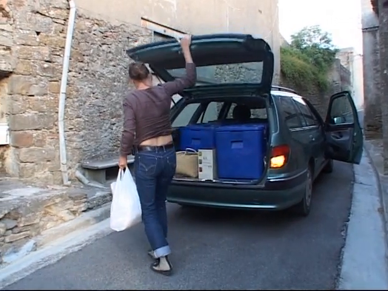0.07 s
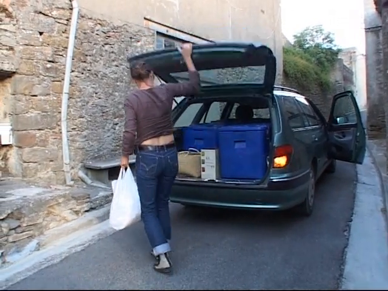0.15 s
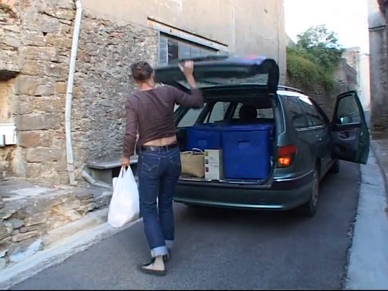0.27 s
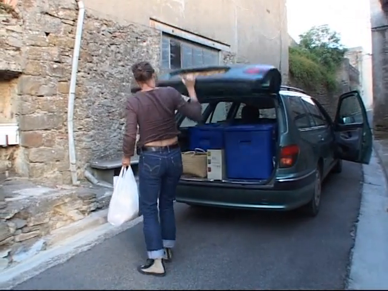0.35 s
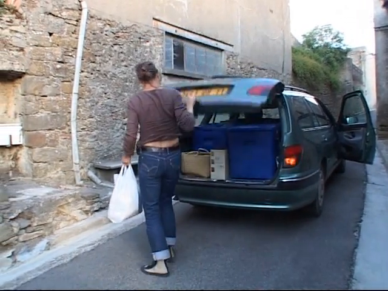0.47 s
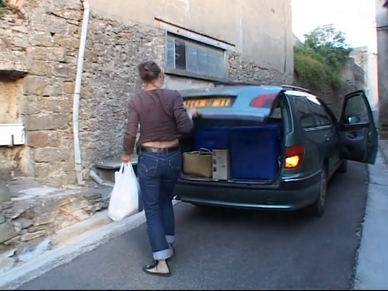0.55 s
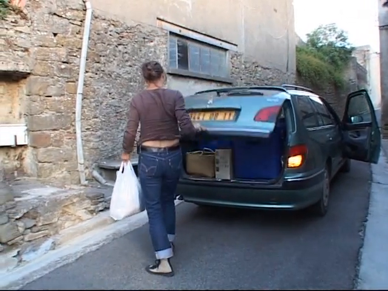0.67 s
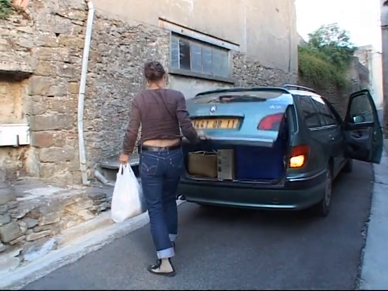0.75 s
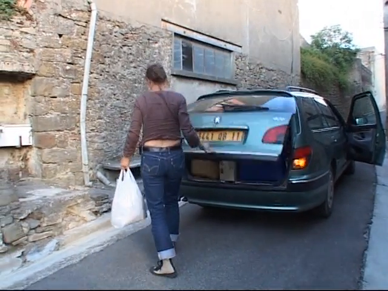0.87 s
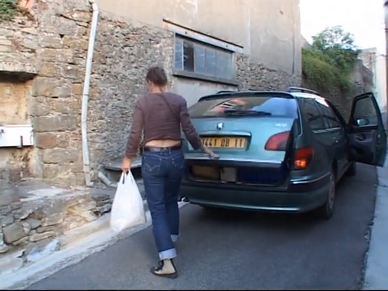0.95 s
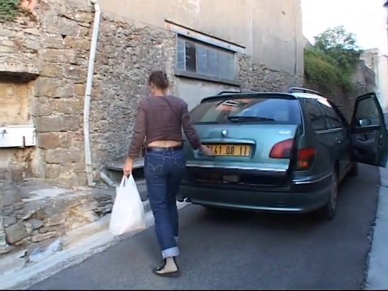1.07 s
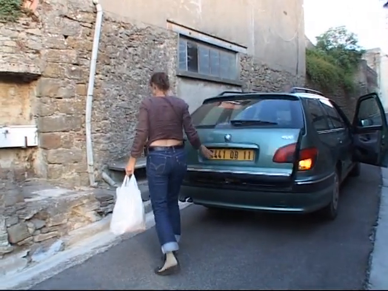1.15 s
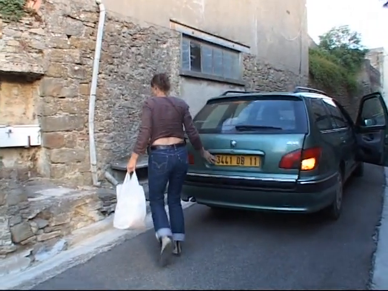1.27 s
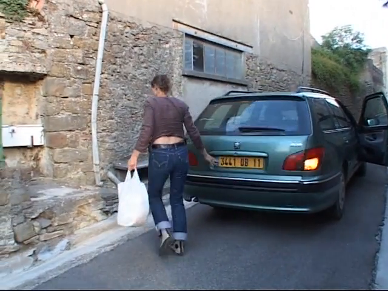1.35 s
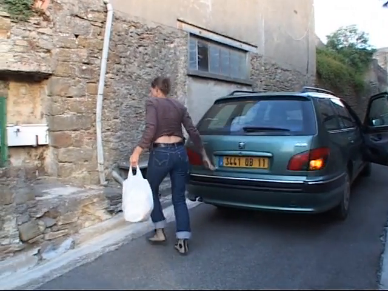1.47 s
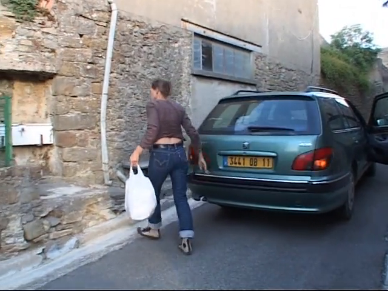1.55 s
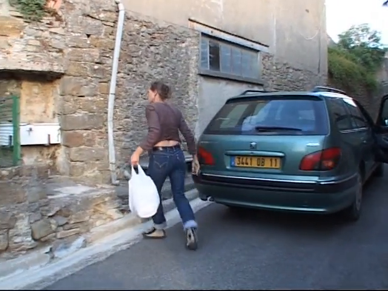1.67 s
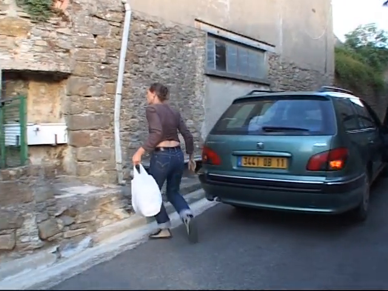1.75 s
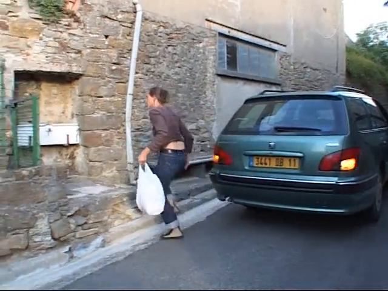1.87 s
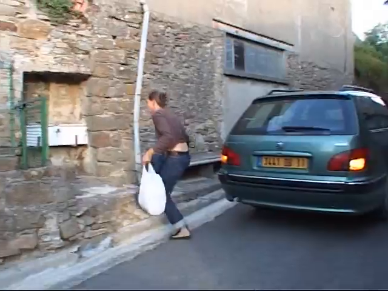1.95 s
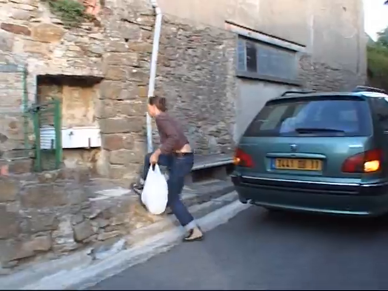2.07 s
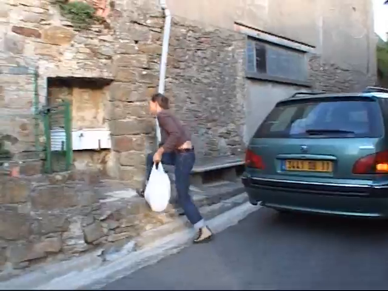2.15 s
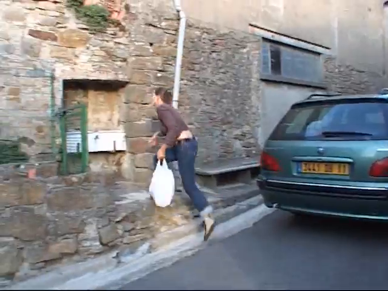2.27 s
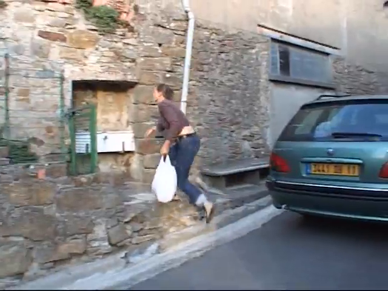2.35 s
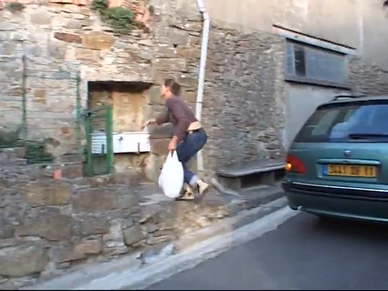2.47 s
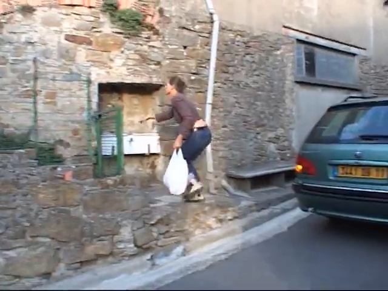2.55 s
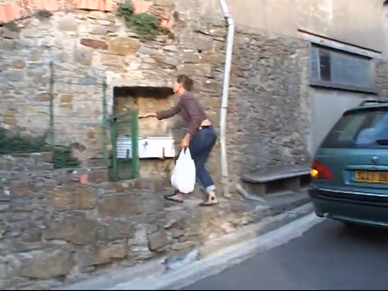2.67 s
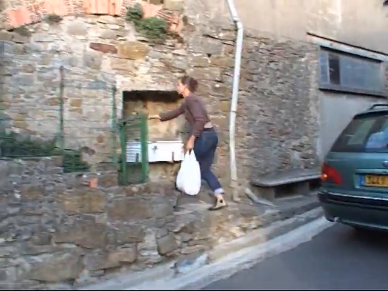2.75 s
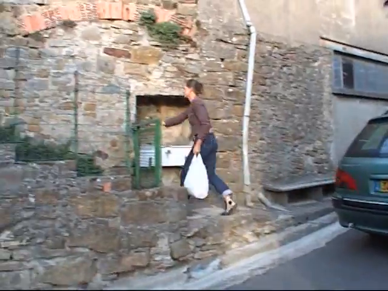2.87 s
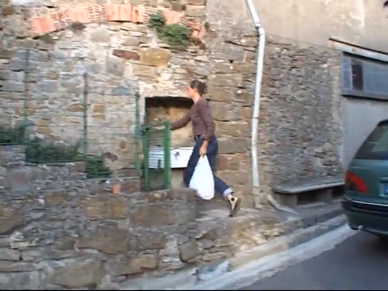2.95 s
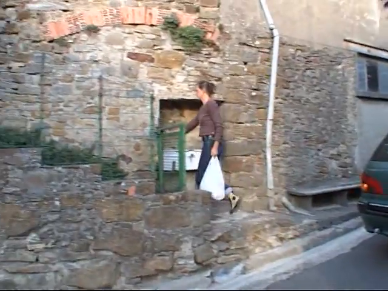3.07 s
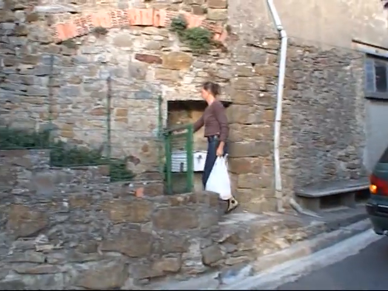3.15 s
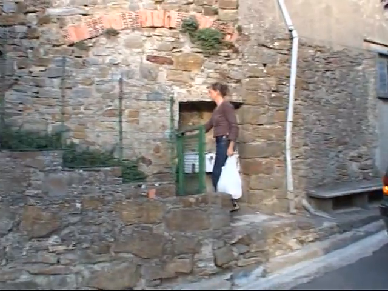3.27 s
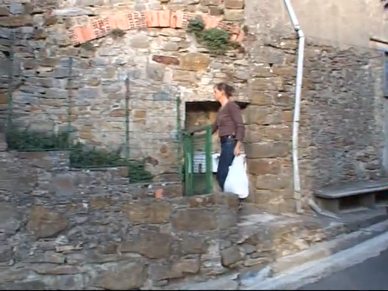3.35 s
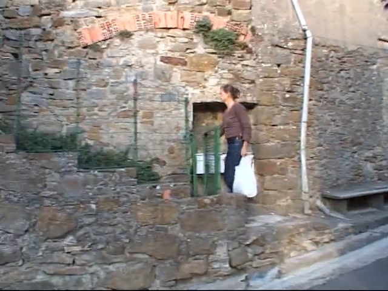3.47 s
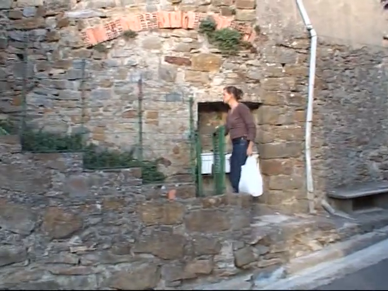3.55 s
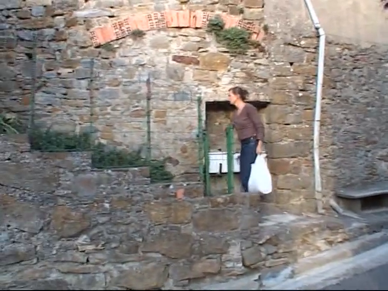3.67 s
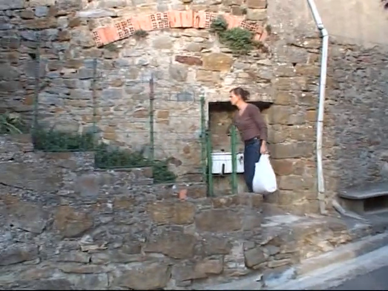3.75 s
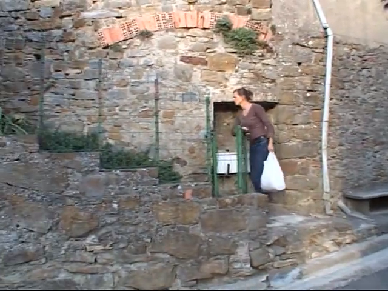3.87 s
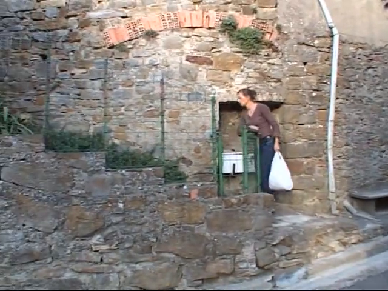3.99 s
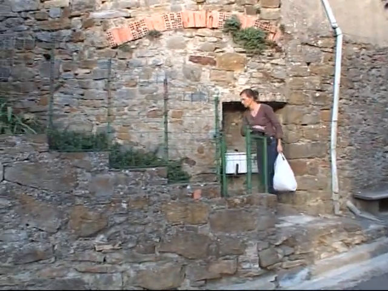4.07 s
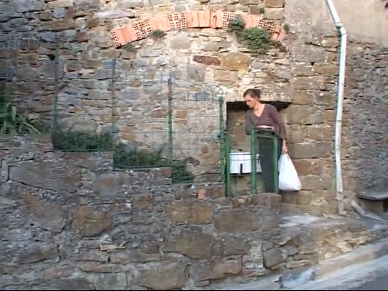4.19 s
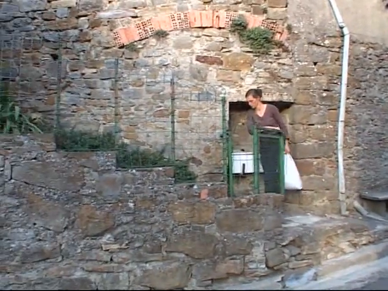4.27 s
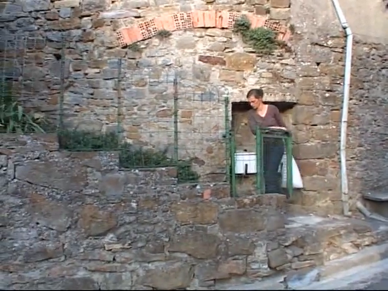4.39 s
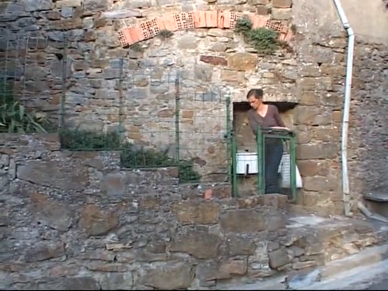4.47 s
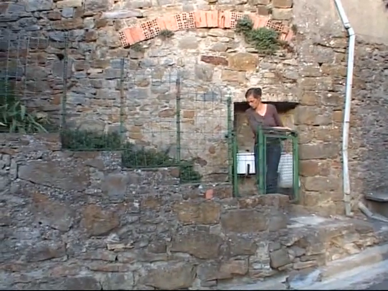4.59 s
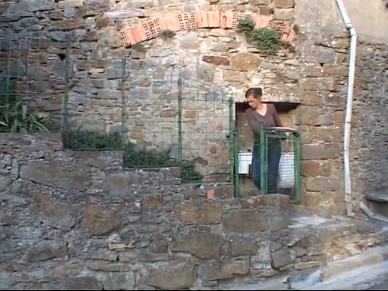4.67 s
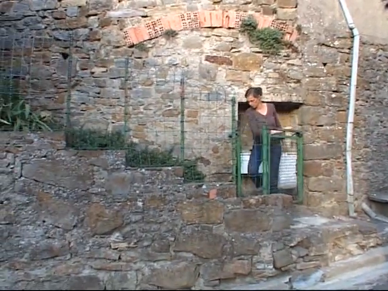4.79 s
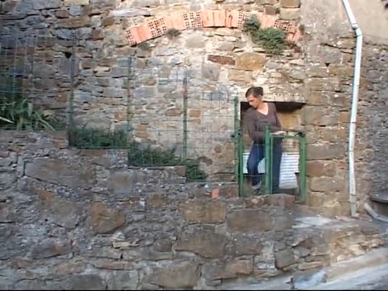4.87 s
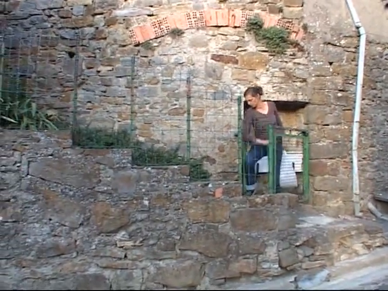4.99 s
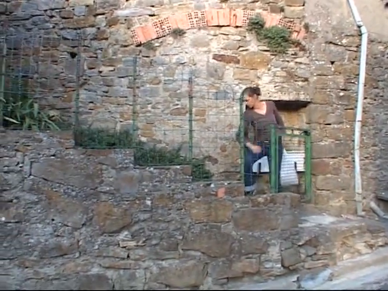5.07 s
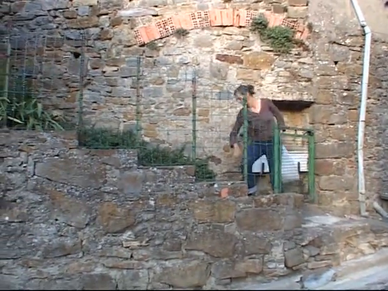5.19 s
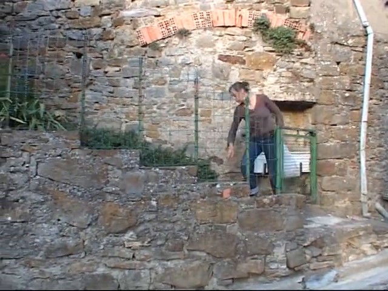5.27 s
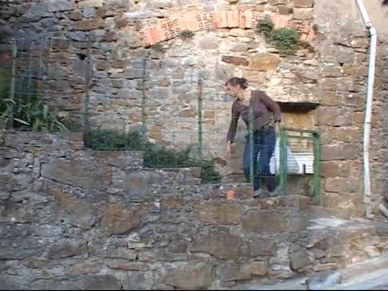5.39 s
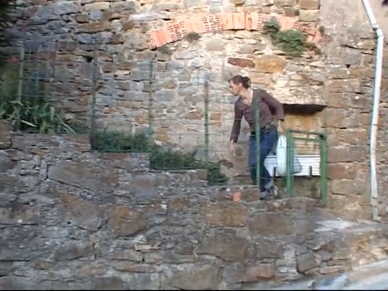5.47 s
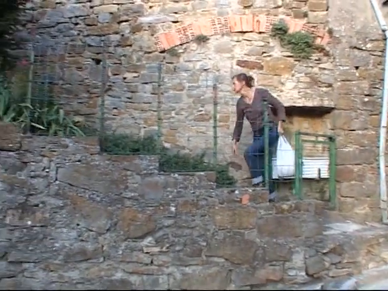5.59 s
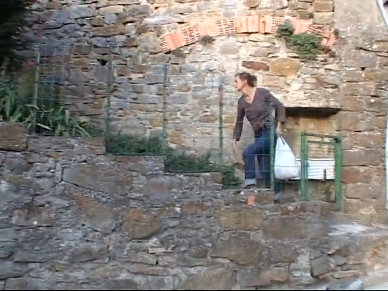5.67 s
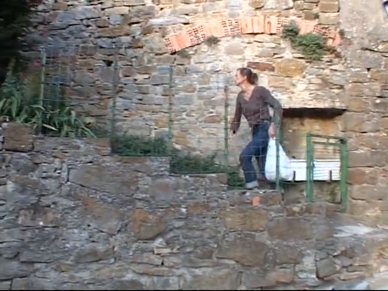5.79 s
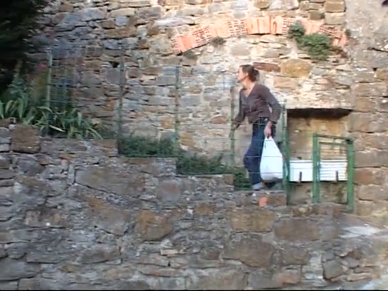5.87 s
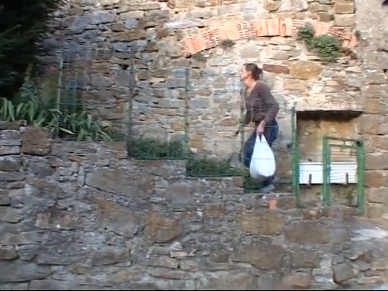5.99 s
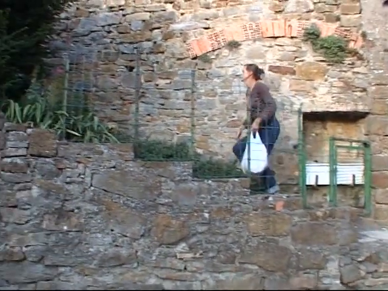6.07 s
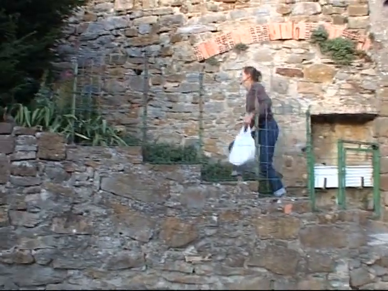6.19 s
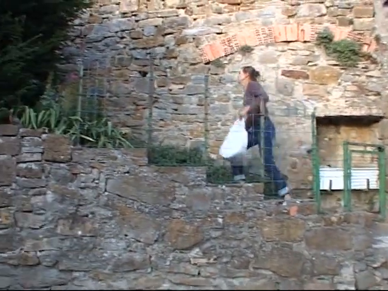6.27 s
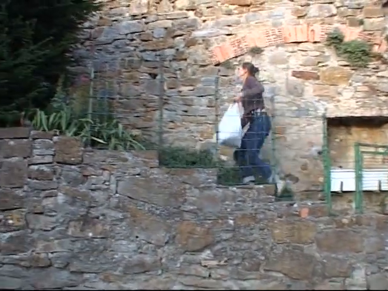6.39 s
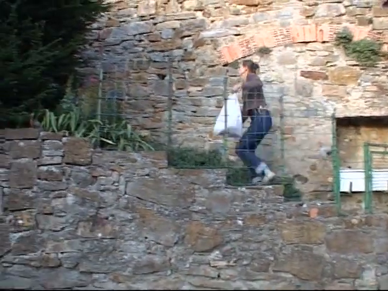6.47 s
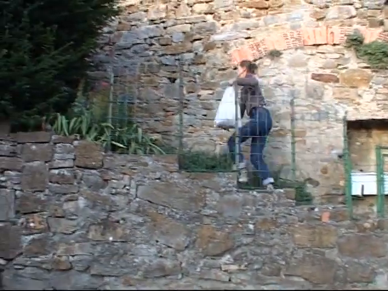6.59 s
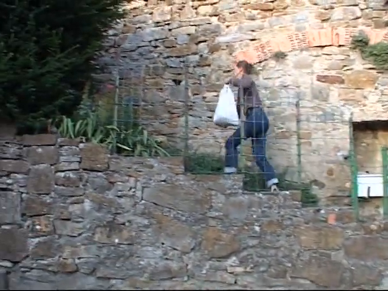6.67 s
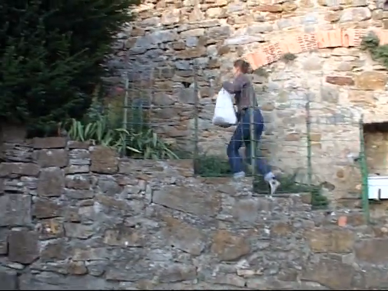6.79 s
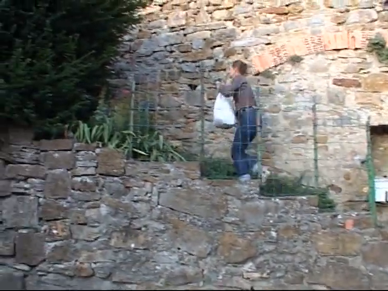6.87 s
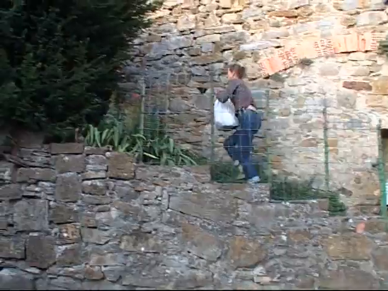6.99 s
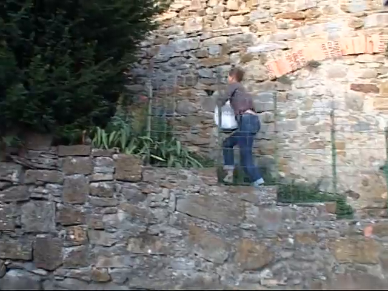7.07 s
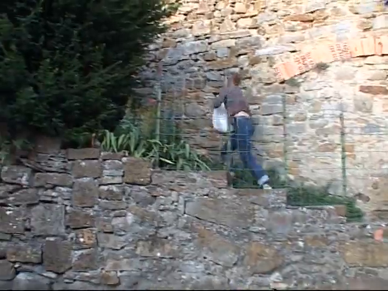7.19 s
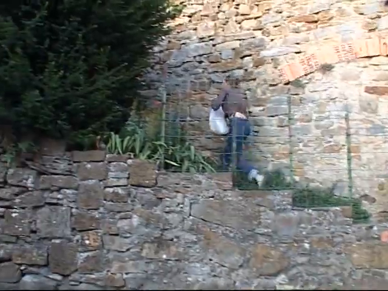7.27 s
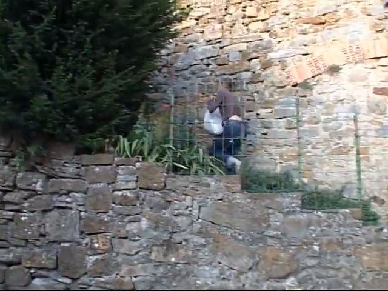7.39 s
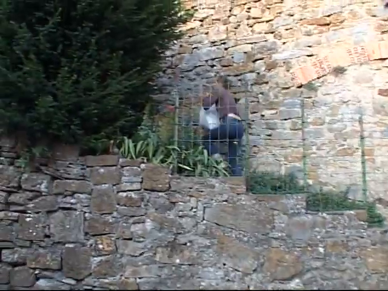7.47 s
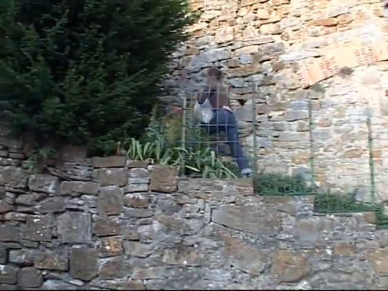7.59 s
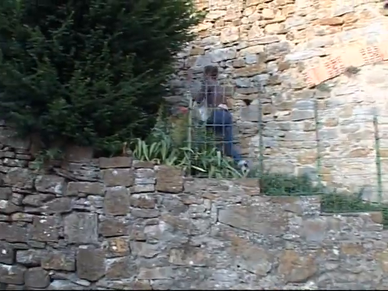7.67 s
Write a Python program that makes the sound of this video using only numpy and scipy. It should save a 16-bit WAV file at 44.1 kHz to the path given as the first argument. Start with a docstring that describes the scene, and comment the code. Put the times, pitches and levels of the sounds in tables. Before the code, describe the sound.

A quiet outdoor stone lane, heard from a few metres: soft hiss, a faint wavering low hum and a distant rumble throughout. From 0 to 1.1 s come muted footfalls, bumps and light plastic bag rustle, with a small bird chirp near 0.5. Two tiny clicks at about 1.18 precede the loudest event, a car tailgate slam at 1.38: dense, boomy, metallic, over quickly, with a short wall echo. Soft steps, faint rustles and thin gliding bird notes continue to 3. At 3.05 a latch gives a short rough squeak; light metal knocks build to a bright gate clack at 3.54. A few faint bird calls follow. Around 4.55 come small ticks and knocks, with a brief low hinge hoot at 4.78. Quiet steps follow, then the bag crumples crisply from 6.4, with sharp crackles strongest at 6.8-7.0. Light footfalls and a last tick at 7.6 end it.

```python
"""A car tailgate slams in a narrow stone lane, a few metres from a camcorder: noise bursts driving panel modes.
Someone moves about with a plastic bag: filtered-noise bumps and steps, sharp ticks and grainy crumples of film.
A light metal gate rattles as knocks ring its bars, its latch scrapes as a tone of uneven pitch, its hinge hoots.
Small birds call in gliding near-sine notes; noise through a decaying tail makes the stone walls answer.
Underneath lie soft hiss, a low wavering hum and a distant rumble."""
import sys
import numpy as np
from scipy import signal
from scipy.fft import rfft, irfft, next_fast_len
from scipy.io import wavfile
from scipy.ndimage import uniform_filter1d

SR = 44100
rng = np.random.default_rng(int(sys.argv[2]) if len(sys.argv) > 2 else 0)


def store_pcm(level_fs):
    """Save levels as 16-bit WAV."""
    pcm = np.round(np.clip(level_fs, -1, 1) * 32767).astype(np.int16)
    wavfile.write(sys.argv[1], SR, np.atleast_2d(pcm).T)


N = 341082
T = np.arange(N) / SR  # s

# contacts of the closing tailgate: start_s, level_db, rise_ms, fall_ms, brightness_db_per_octave
SLAM_CONTACTS = [(1.367, -34.5, 4.6, 14, 1.5), (1.374, -23.5, 6, 8.4, 1), (1.385, -18.5, 3, 10.3, 2),
                 (1.395, -21, 3.5, 24.8, 1), (1.403, -23, 3, 19, 0.5), (1.419, -26, 3.6, 29, -2),
                 (1.446, -44, 5, 46, -4.5), (1.482, -49, 2, 6, 10.5), (1.538, -55.5, 2.7, 20, 7)]
# modes of the tailgate panels: pitch_hz, level_db, t60_s
PANEL_MODES = [(1080, 6, 0.064), (1210, -5, 0.08), (1428, -6, 0.15), (1660, -7.5, 0.18), (1904, -4.5, 0.15),
               (2148, -5.5, 0.13), (2045, -2.5, 0.061), (2960, -4, 0.15)]
# noise colour of the slam: frequency_hz, density_db
PANEL_COLOUR = [(130, -31.5), (220, -4), (330, -7), (493, -3.5), (786, -9.5), (1110, -6.5), (2030, -17),
                (2260, -13.5), (2520, -18.5), (11200, -39), (16000, -50.5)]
# low modes of the cabin air and the body shell: pitch_hz, level_db, t60_s
CABIN_MODES = [(52, -8, .4), (83, -5, 0.4), (108.3, 1, 0.11), (124, -6.5, 0.44), (136, -4, 0.38),
               (171, -1, 0.25), (228, -6, 0.25), (285, 0, 0.3), (327, 1, 0.24), (464, 20, 0.12),
               (497, 21, 0.12), (612, 17, 0.15)]
# first light touches of the tailgate: start_s, peak_db
TOUCHES = [(1.1794, -41), (1.188, -37.5)]
# modes of the trim: pitch_hz, level_db, t60_s
TRIM_MODES = [(339, -4, .12), (617, -2, .06), (1030, 3, .03), (1228, -2, .11)]
# knocks and scrapes on the gate: start_s, level_db, rise_ms, fall_ms, brightness_db_per_octave
GATE_CONTACTS = [(3.036, -47, 1.3, 58, 0.5), (3.32, -56.5, 0.89, 6, 12), (3.322, -52, 5.8, 27, -5.5),
                 (3.346, -47, 1.2, 6.5, -2.5), (3.35, -55.5, 7.8, 61, -4), (3.441, -53, 0.5, 1.4, -0.5),
                 (3.468, -49.5, 7.6, 53, -4), (3.488, -40.5, 1.7, 79, -3), (3.537, -36.5, 2.1, 14, 4),
                 (3.544, -32.5, 1.6, 29, 3), (3.58, -46, 3.5, 25, -5.5), (3.61, -48.5, 3.4, 29, -4),
                 (4.558, -60, 0.99, 12, -1)]
# modes of the gate bars: pitch_hz, level_db, t60_s
BAR_MODES = [(640, -1, 0.06), (1090, -6, 0.1), (1850, 0, 0.08), (2005, -6, 0.11), (2494, 0, 0.09),
             (2555, 2, 0.09), (2600, 0, 0.11), (4409, 2, 0.11), (3235, -4, 0.08), (5005, 0, 0.08),
             (5567, -2, 0.09), (5979, 0, 0.08), (7000, -11, 0.061), (8300, 3, 0.099), (8947, -7, 0.14),
             (11740, -2, 0.12)]
# noise colour of the gate knocks: frequency_hz, density_db
GATE_COLOUR = [(120, -37), (200, -28), (424, -26), (635, -15.5), (1100, -10.5), (1600, -8), (1940, -2),
               (4120, -6.5), (4520, -5), (11900, -21.5), (16000, -40)]
# the latch scraping in its keeper: time_s, slip_rate_hz, level_db
LATCH_SLIPS = [(3.042, 2230, -53), (3.052, 2294, -40.5), (3.064, 2310, -37), (3.08, 2466, -42.5),
               (3.094, 2362, -45), (3.118, 2320, -50), (3.131, 2330, -71), (3.16, 2304, -57)]
# harmonics of the scrape, from the first up: level_db
SLIP_HARMONICS_DB = [0.5, -4, -11, -15, -23]
# modes of the latch: pitch_hz, level_db, t60_s
LATCH_MODES = [(2030, 11, 0.13), (2190, 6, 0.12), (2320, 2, 0.13), (2487, 7, 0.14), (2573, 7, 0.14),
               (4430, 9, 0.1), (4603, 11, 0.17), (5040, 12, .07), (6800, 17, 0.035), (7150, 15, 0.04),
               (8980, 21, 0.025)]
# harmonics of the hinge hoot, from the first up: level_db
HOOT_HARMONICS_DB = [3.5, -26, -30]
# footfalls, bumps, knocks and scuffs: start_s, level_db, body_hz, thud_above_body_db, fall_ms
BUMPS = [(0.009, -48, 530, -5, 25), (0.257, -53, 720, -12, 18), (0.359, -45.5, 680, -6, 10),
         (0.521, -48, 294, -11, 10.5), (1.637, -43.5, 312, -3.5, 27), (1.644, -51, 1820, -11, 20),
         (1.841, -58.5, 664, -14, 15), (2.308, -53.5, 298, -11, 26), (2.542, -62.5, 233, 17.5, 10),
         (2.619, -60, 960, -15, 21), (2.891, -59.5, 259, -1.5, 26), (4.565, -52, 1200, -40, 8.7),
         (4.686, -52.5, 2600, -21.5, 8.8), (4.822, -58, 805, -20, 9.8), (4.83, -62, 1290, -14, 7.7),
         (4.972, -58, 640, -4, 32), (5.08, -59.5, 1330, -17, 8.7), (5.145, -60.5, 720, -23, 27),
         (5.368, -54, 250, 5, 22), (5.521, -61, 1500, 2, 56), (6.02, -62, 301, 1, 15),
         (6.279, -58, 395, -9, 23), (6.428, -58, 398, 0, 9.3), (6.904, -50.5, 580, 1.5, 8.4),
         (7.169, -66, 229, 17, 7.3), (7.478, -60.5, 285, 14.5, 8.8), (7.685, -55, 353, -6, 9.2)]
# sharp ticks of plastic and grit: start_s, level_db, centre_hz
SHARP_TICKS = [(0.421, -46.5, 1960), (0.805, -50.5, 6050), (0.965, -53, 11000), (1.337, -55, 11830),
               (2.979, -47, 7920), (3.824, -51.5, 2570), (3.859, -58, 1560), (4.085, -55.5, 4940),
               (4.522, -57.5, 2990), (4.535, -51.5, 1400), (4.557, -43.5, 4400), (4.568, -47.5, 1400),
               (4.679, -46.5, 6500), (4.961, -56.5, 1500), (6.559, -52.5, 9140), (6.576, -50, 5000),
               (6.628, -54, 10500), (6.642, -42.5, 10300), (6.725, -48, 10500), (6.76, -48, 12000),
               (6.77, -46, 3000), (6.774, -51, 5000), (6.807, -40.5, 9000), (6.827, -39, 8350),
               (6.886, -42, 7000), (6.894, -45, 8100), (6.909, -38, 10500), (6.91, -45, 1210),
               (6.914, -32.5, 8350), (6.941, -43, 8810), (6.962, -36, 7900), (6.981, -39.5, 7840),
               (7.031, -52, 10400), (7.599, -50, 3150), (7.6125, -40, 2550)]
# the bag crumpling as it swings: start_s, length_s, level_db, crisp_share (0-1)
BAG_CRUMPLES = [(0.014, 0.12, -54, 0.21), (0.176, 0.089, -58, 0.25), (0.322, 0.16, -59.5, 0.3),
                (0.541, 0.33, -64.5, 0.19), (0.95, 0.074, -65.5, 0.04), (1.042, 0.064, -62.5, 0.43),
                (1.155, 0.18, -60.5, 0.34), (1.73, 0.23, -67, 0.16), (1.973, 0.21, -61.5, 0.33),
                (2.212, .13, -58.5, 0.37), (2.41, 0.12, -68.5, 0.1), (2.602, 0.15, -67.5, 0.14),
                (3.693, 0.26, -66.5, 0.18), (3.997, 0.13, -68.5, 0.36), (4.665, 0.1, -64, 0.25),
                (4.959, 0.077, -58.5, 0.38), (5.059, 0.12, -62, 0.37), (5.2, 0.25, -67, 0.18),
                (5.493, 0.09, -64, 0), (5.734, 0.049, -66.5, 0.28), (5.973, 0.16, -70, 0.35),
                (6.137, 0.26, -64.5, 0.35), (6.389, 0.18, -59, 0.63), (6.547, 0.24, -52.5, 0.64),
                (6.804, 0.087, -50.5, 0.6), (6.879, 0.056, -48, 0.62), (6.982, 0.053, -68, 0.1),
                (7.093, 0.24, -65.5, 0.4), (7.265, 0.078, -58.5, 0.37), (7.357, 0.054, -59.5, 0.5),
                (7.497, 0.12, -62, 0.36), (7.599, 0.12, -58.5, 0.4)]
# noise colour of the film before tilting: frequency_hz, density_db
BAG_COLOUR = [(250, -11.5), (600, -5.5), (1500, 0.5), (3000, 2), (6000, 3), (11000, -6.5), (13000, -18),
              (15500, -23)]
# bird calls: start_s, length_s, start_hz, middle_hz, end_hz, level_db, trill_hz
BIRD_CALLS = [(0.502, 0.047, 4220, 4600, 3630, -56.5, 182), (0.541, 0.042, 2980, 3400, 3040, -54.5, 160),
              (1.037, 0.17, 4040, 3960, 3700, -65, 320), (1.98, 0.06, 4500, 4480, 4450, -70, 40),
              (1.995, 0.074, 3500, 3180, 3000, -63, 130), (2.26, 0.087, 5800, 5240, 4750, -64, 350),
              (2.484, 0.075, 4350, 4380, 4050, -70, 50), (2.529, 0.097, 4000, 3700, 3600, -66, 320),
              (3.374, 0.14, 4500, 4300, 3950, -72, 150), (4.133, 0.05, 4200, 4180, 4100, -73, 98.6),
              (4.176, 0.14, 4220, 3980, 3650, -65.5, 297), (4.317, 0.064, 4200, 5200, 4970, -72, 600),
              (4.866, 0.11, 4200, 3900, 3680, -66.5, 280), (5.21, 0.041, 3350, 4200, 3300, -58, 120),
              (5.81, 0.06, 3750, 3380, 3050, -67, 180), (5.81, 0.077, 1445, 1474, 1430, -72, 60),
              (5.935, 0.052, 1340, 1530, 1500, -73, 60.3), (5.975, 0.075, 4150, 3940, 3300, -71.5, 120)]
# noise colour of the soft hiss: frequency_hz, density_db
AIR_COLOUR = [(150, -23.5), (250, -3.5), (354, 0), (802, -6), (875, -3.5), (1020, -8), (4650, -9),
              (6360, -15.5), (11900, -14.5), (16000, -20)]
# level path of the distant rumble: time_s, level_db
RUMBLE_LEVEL = [(0.0, -61), (0.9, -59.5), (1.9, -58.5), (2.499, -61), (3.001, -64), (4.45, -66.5),
                (4.62, -60), (4.9, -66.5), (5.3, -59.5), (5.9, -62.5), (6.1, -62.5), (6.9, -62),
                (7.73, -67)]
# noise colour of the rumble and of the slam's bass roll: frequency_hz, density_db
BASS_COLOUR = [(20, -33), (35, -1.5), (55, -3), (78, 2), (118, -10.5), (150, -5), (200, -7), (300, -16),
               (500, -61)]

PANEL_RING_DB, TOUCH_MS = -18, 0.12
BOOM_S, BOOM_DB, BOOM_MS = 1.381, -14, 1.6
ROLL_DB, ROLL_RISE_MS, ROLL_FALL_MS = -43, 60, 110
BARS_RING_DB, LATCH_RING_DB = -6.5, -3
LET_GO_S, HELD_DB = 3.536, -3
CRACK_S, CRACK_DB, CRACK_MS, CRACK_RING_DB = 3.545, -23, 0.025, -41.5
SLIP_JITTER, SLIP_ROUGH_DB = 0.045, 3.5  # jitter as a share of the slip rate
HOOT_S, HOOT_HZ, HOOT_DB = 4.78, 327, -51.5
HOOT_RISE_MS, HOOT_HOLD_MS, HOOT_FALL_MS = 4.9, 21, 13
BUMP_RISE_MS, THUD_HZ, SCUFF_HZ, SCUFF_DB = 2.2, 120, 2310, -11
TICK_FALL_MS, TICK_OCTAVES = 1.0, 0.6
SNAP_DB, SNAP_OCTAVES = 5, 1.3  # first break of a tick, peak above its grit level
CRUMPLE_RISE_S, CRUMPLE_SAG_DB_PER_S, CRUMPLE_RELEASE_DB_PER_S = 0.013, 1, 234.5
CREASES_PER_S, CREASE_DB, CREASE_SPREAD_DB = 110, 6, 2.5
BIRD_GRAIN_DB = 3
LANE_T60_S, LANE_TREBLE_T60_S, LANE_DB, LANE_LOW_HZ = 0.58, 0.29, -16.5, 220
WALKER_WET_DB = 3
AIR_DB = -68.5
HUM_HZ, HUM_DB, HUM_WAVER_HZ, HUM_WAVER_DB = 150, -68, 1.3, 0.5
MIC_LOW_HZ, TOP_HZ = 46, 15650


def undb(db):
    """Decibels to amplitude."""
    return 10 ** (np.asarray(db) / 20)


def unit(x):
    """Scale to rms 1."""
    return x / np.sqrt(np.mean(x ** 2))


def peak_unit(x):
    """Scale to peak 1."""
    return x / np.max(np.abs(x))


def noise(colour, tilt_db=0):
    """Noise of rms 1 with the given spectrum, tilted per octave about 3 kHz."""
    hz, db = np.transpose(colour)
    size = next_fast_len(N, True)
    f = np.maximum(np.arange(size // 2 + 1) * SR / size, 1)
    shape_db = np.interp(np.log(f), np.log(hz), db)
    shape_db += tilt_db * np.log2(np.clip(f, 200, None) / 3000)
    spectrum = rfft(rng.standard_normal(size)) * undb(shape_db)
    return unit(irfft(spectrum, size)[:N])


def walk(rate):
    """Smooth chance of rms 1 that changes about rate times a second."""
    k = max(int(SR / rate), 1)
    smooth = uniform_filter1d(rng.standard_normal(N), k)
    return unit(uniform_filter1d(smooth, k))


def rise_fall(age_ms, rise_ms, fall_ms):
    """Linear rise to 1, then exponential fall."""
    return np.minimum(age_ms / rise_ms, 1) * np.exp(-np.maximum(age_ms - rise_ms, 0) / fall_ms)


def swell(s, rise_ms, fall_ms):
    """Envelope of a contact that begins at s."""
    return rise_fall(np.maximum(T - s, 0) * 1000, rise_ms, fall_ms)


def pulse(s, width_ms):
    """Brief bell-shaped push centred on s."""
    return np.exp(-((T - s) * 1000 / width_ms) ** 2)


def ring(x, modes):
    """Decaying resonances driven by x; neighbours swing in opposite senses."""
    out = 0
    for k, (hz, db, t60) in enumerate(modes):
        pole = np.exp(2j * np.pi * hz / SR - np.log(1000) / (t60 * SR))
        out = out + (-1) ** k * undb(db) * signal.lfilter([1], [1, -pole], x).imag
    return out


def band(x, hz, width):
    """Broad resonance; width in octaves each side."""
    edges = np.clip([hz / 2 ** width, hz * 2 ** width], 30, .45 * SR)
    return signal.sosfilt(signal.butter(2, edges, "band", fs=SR, output="sos"), x)


def clatter(contacts, colour):
    """Each contact shakes out a burst of coloured noise."""
    out = np.zeros(N)
    for s, db, rise_ms, fall_ms, tilt_db in contacts:
        out += undb(db) * swell(s, rise_ms, fall_ms) * noise(colour, tilt_db)
    return out


def struck(shake, modes, ring_db, freedom=1):
    """A shaken body: the shaking itself plus the modes it drives, scaled to the shaking's energy."""
    return shake + undb(ring_db) * unit(ring(freedom * shake, modes)) * np.std(shake)


def stack(hz, harmonics_db):
    """Harmonic tone on a moving pitch."""
    phase = 2 * np.pi * np.cumsum(hz) / SR
    return sum(undb(db) * np.sin((k + 1) * phase) for k, db in enumerate(harmonics_db))


def tailgate():
    """Light touches ring the trim, seals, latch and panels meet, and the main blow sets the low modes going."""
    out = struck(clatter(SLAM_CONTACTS, PANEL_COLOUR), PANEL_MODES, PANEL_RING_DB)
    for s, db in TOUCHES:
        out += undb(db) * peak_unit(ring(pulse(s, TOUCH_MS), TRIM_MODES))
    boom = ring(swell(BOOM_S, BOOM_MS, BOOM_MS), CABIN_MODES)
    bass_roll = swell(BOOM_S, ROLL_RISE_MS, ROLL_FALL_MS) * noise(BASS_COLOUR)
    return out + undb(BOOM_DB) * peak_unit(boom) + undb(ROLL_DB) * bass_roll


def gate_rattle():
    """Knocks shake the bars into ringing; the latch bar strikes home with a sharp crack."""
    shake = clatter(GATE_CONTACTS, GATE_COLOUR) + undb(CRACK_DB) * pulse(CRACK_S, CRACK_MS)
    freedom = np.where(T < LET_GO_S, undb(HELD_DB), 1)  # a hand holds back the bars until it lets go
    strike = 1. * (np.arange(N) == int(CRACK_S * SR))
    clang = undb(CRACK_RING_DB) * ring(strike, BAR_MODES)  # one impulse rings every mode at once
    return struck(shake, BAR_MODES, BARS_RING_DB, freedom) + clang


def latch_scrape():
    """Fast uneven slips make a rough harmonic tone that drives the latch modes."""
    s, hz, db = np.transpose(LATCH_SLIPS)
    slip_hz = np.interp(T, s, hz) * (1 + SLIP_JITTER * walk(880))
    level_db = np.interp(T, s, db, -200, -200) + SLIP_ROUGH_DB * walk(330)
    slips = stack(slip_hz, SLIP_HARMONICS_DB) * undb(level_db)
    return struck(slips, LATCH_MODES, LATCH_RING_DB)


def hinge_hoot():
    """The hinge sounds one short steady harmonic tone: rise, hold, exponential fall."""
    age_ms = (T - HOOT_S) * 1000
    tone = undb(HOOT_DB) * stack(np.full(N, 1. * HOOT_HZ), HOOT_HARMONICS_DB)
    fall = np.exp(-np.maximum(age_ms - HOOT_RISE_MS - HOOT_HOLD_MS, 0) / HOOT_FALL_MS)
    return tone * np.clip(age_ms / HOOT_RISE_MS, 0, 1) * fall


def add_burst(out, s, db, hz, width, rise_ms, fall_ms):
    """Adds one short noise burst around hz."""
    i = int(s * SR)
    size = min(SR // 6, N - i)
    grit = band(rng.standard_normal(SR // 6), hz, width)[:size]
    age_ms = np.arange(size) * 1000 / SR
    out[i:i + size] += undb(db) * unit(grit) * rise_fall(age_ms, rise_ms, fall_ms)


def bumps():
    """Footfalls, bumps, knocks and scuffs: each a body knock, a low thud and a scuff band, all of noise."""
    out = np.zeros(N)
    for s, db, hz, thud_db, fall_ms in BUMPS:
        add_burst(out, s, db, hz, .6, BUMP_RISE_MS, fall_ms)
        add_burst(out, s, db + thud_db, THUD_HZ, .7, BUMP_RISE_MS, fall_ms)
        add_burst(out, s, db + SCUFF_DB, SCUFF_HZ, .9, BUMP_RISE_MS, fall_ms)
    return out


def ticks():
    """Each tick is a broad snap, the response of a wide band to one impulse, and a little grit."""
    out = np.zeros(N)
    impulse = 1. * (np.arange(SR // 100) == 0)
    for s, db, hz in SHARP_TICKS:
        add_burst(out, s, db, hz, TICK_OCTAVES, .4, TICK_FALL_MS)
        snap = peak_unit(band(impulse, hz, SNAP_OCTAVES))
        i = int(s * SR)
        out[i:i + len(snap)] += undb(db + SNAP_DB) * snap
    return out


def bag():
    """Rubbing film hisses: each crumple rises, sags, then dies; creases snap at random, mostly in the treble."""
    dull_power, crisp_power = 0, 0
    for s, length, db, crisp_share in BAG_CRUMPLES:
        age = T - s
        sag_db = CRUMPLE_SAG_DB_PER_S * np.clip(age, 0, length)
        release_db = CRUMPLE_RELEASE_DB_PER_S * np.maximum(age - length, 0)
        level = np.clip(age / CRUMPLE_RISE_S, 0, 1) * undb(db - sag_db - release_db)
        dull_power = dull_power + (1 - crisp_share) * level ** 2
        crisp_power = crisp_power + crisp_share * level ** 2
    creases = rng.random(N) < CREASES_PER_S / SR
    snaps = creases * undb(CREASE_DB + CREASE_SPREAD_DB * rng.exponential(size=N))
    snaps = signal.lfilter([1], [1, -np.exp(-1 / (0.001 * SR))], snaps)  # each dies over about 1 ms
    dull = noise(BAG_COLOUR, -4.0) * (1 + 0.33 * snaps) * undb(1.8 * walk(70))
    crisp = noise(BAG_COLOUR, 15.6) * (1 + snaps) * undb(0.72 * walk(60))
    return np.sqrt(dull_power) * unit(dull) + np.sqrt(crisp_power) * unit(crisp)


def birds():
    """Near-sine notes on pitch paths that turn at the middle; a fast random trill smears them."""
    out, trill = np.zeros(N), walk(1200)
    grain = undb(BIRD_GRAIN_DB * walk(250))
    for s, length, start_hz, mid_hz, end_hz, db, trill_hz in BIRD_CALLS:
        span = slice(int(s * SR), int((s + length) * SR))
        u = (T[span] - s) / length
        hz = np.interp(u, [0, .5, 1], [start_hz, mid_hz, end_hz]) + trill_hz * trill[span]
        envelope = grain[span] * np.sqrt(np.abs(np.sin(np.pi * u)))
        out[span] += undb(db) * envelope * np.sin(2 * np.pi * np.cumsum(hz) / SR)
    return out


def lane(x):
    """Stone walls return a dense tail whose treble dies first; the bass escapes to the sky."""
    age = T[:SR]
    grit = rng.standard_normal(SR)
    grit = signal.sosfilt(signal.butter(2, LANE_LOW_HZ, "high", fs=SR, output="sos"), grit)
    low = signal.sosfilt(signal.butter(1, 2500, fs=SR, output="sos"), grit)
    treble = grit - low
    tail = low * undb(-60 * age / LANE_T60_S) + treble * undb(-60 * age / LANE_TREBLE_T60_S)
    tail *= np.clip(age / 0.0079, 0, 1)  # builds up over 7.9 ms
    return undb(LANE_DB) * signal.fftconvolve(x, tail / np.sqrt(np.sum(tail ** 2)))[:N]


def background():
    """Soft hiss and swelling distant rumble from coloured noise, and a sine hum wavering in pitch and level."""
    s, db = np.transpose(RUMBLE_LEVEL)
    rumble_db = np.interp(T, s, db) + 0.5 * walk(19) + 0.5 * walk(7.7)
    rumble = undb(rumble_db) * noise(BASS_COLOUR)
    hum_phase = 2 * np.pi * np.cumsum(HUM_HZ + HUM_WAVER_HZ * walk(3.64)) / SR
    hum = undb(HUM_DB + HUM_WAVER_DB * walk(3.1)) * np.sqrt(2) * np.sin(hum_phase)  # sqrt 2: level as rms
    return undb(AIR_DB) * noise(AIR_COLOUR) + rumble + hum


def scene():
    """All sources sound direct and off the walls; bumps, ticks, bag, latch and hinge feed the walls 3 dB harder."""
    bangs_and_birds = tailgate() + gate_rattle() + birds()
    small_sounds = bumps() + ticks() + bag() + latch_scrape() + hinge_hoot()
    echoes = lane(bangs_and_birds + undb(WALKER_WET_DB) * small_sounds)
    return (bangs_and_birds + small_sounds + echoes + background())[None]


def record(dry):
    """The microphone drops the deepest bass; the recorder cuts the top steeply."""
    x = signal.sosfilt(signal.butter(2, MIC_LOW_HZ, "high", fs=SR, output="sos"), dry)
    return signal.sosfilt(signal.ellip(10, .2, 60, TOP_HZ, fs=SR, output="sos"), x)


dry = scene()
out = record(dry)
store_pcm(out)
```